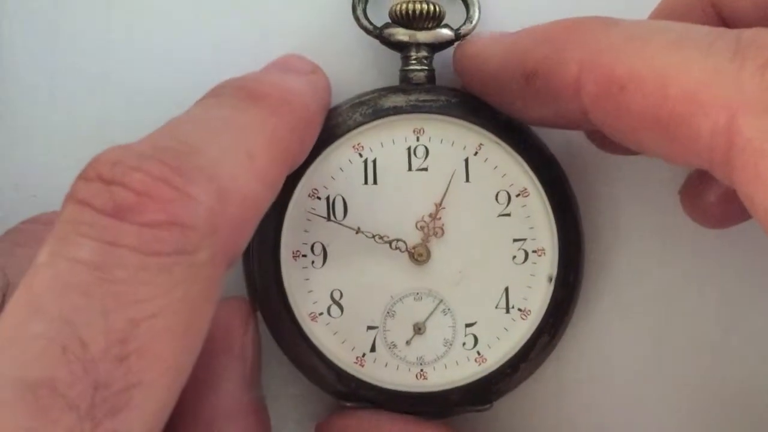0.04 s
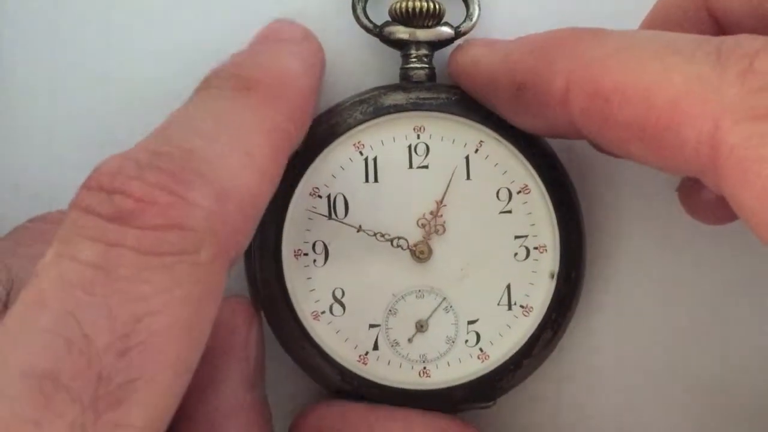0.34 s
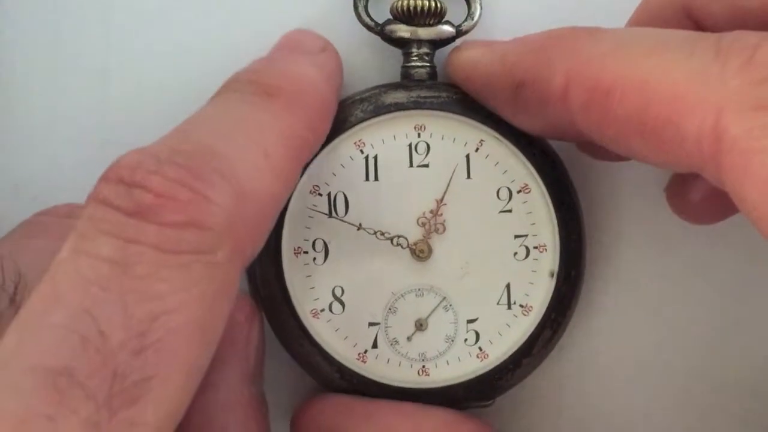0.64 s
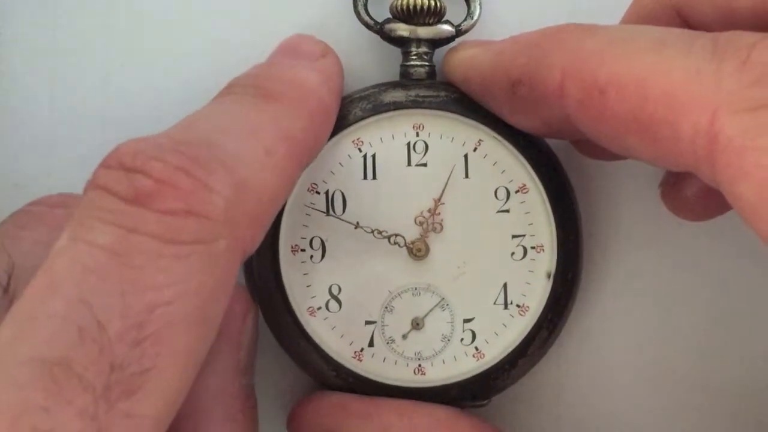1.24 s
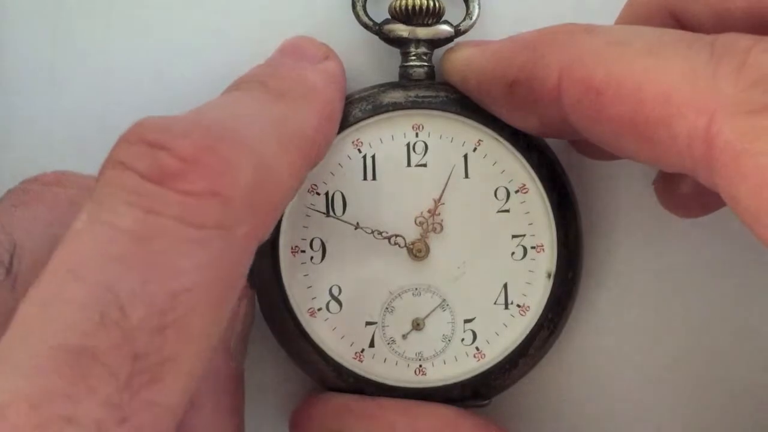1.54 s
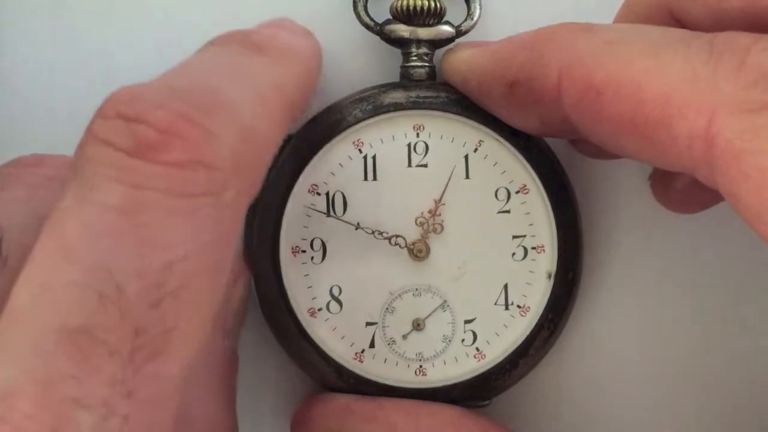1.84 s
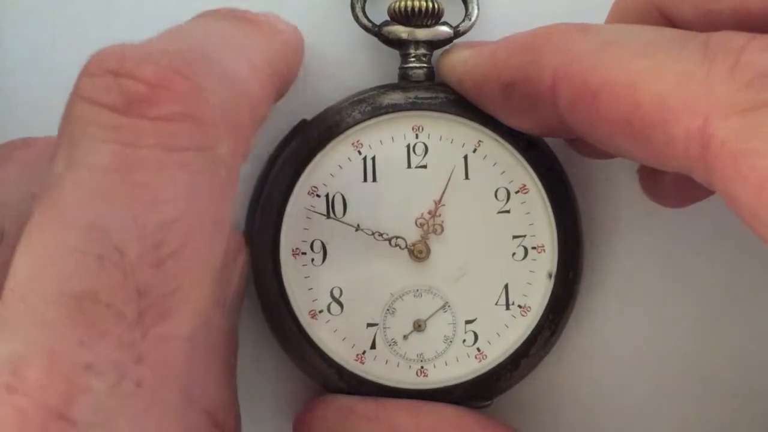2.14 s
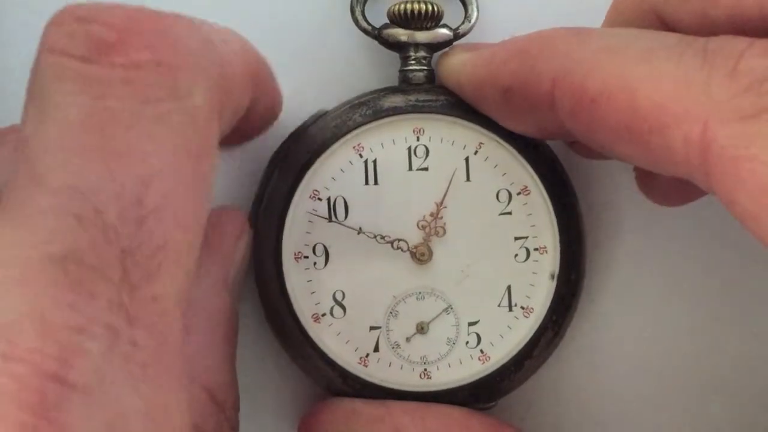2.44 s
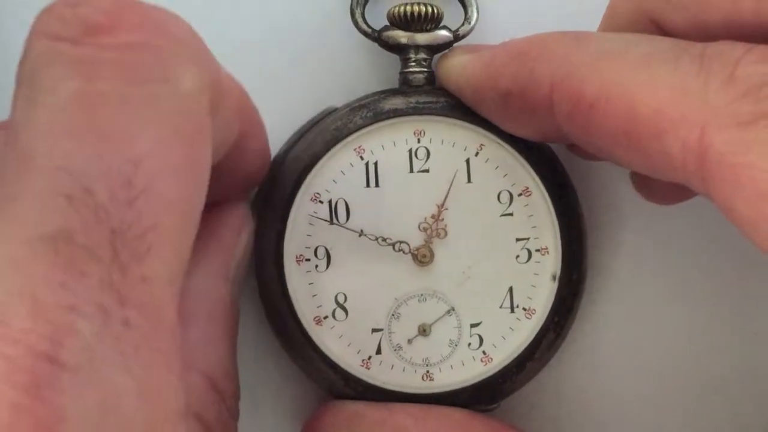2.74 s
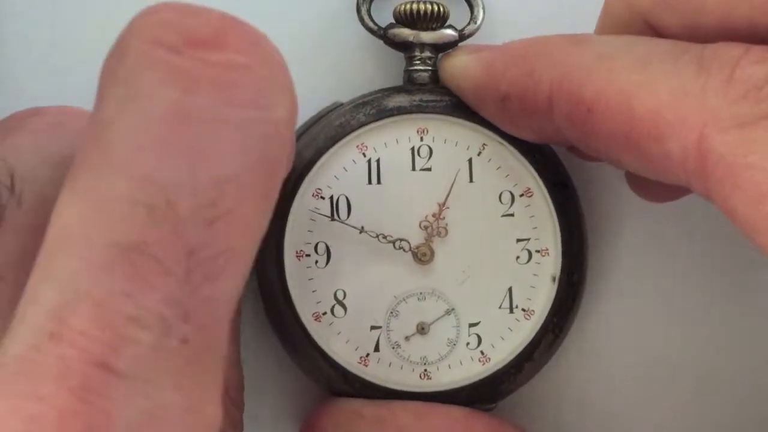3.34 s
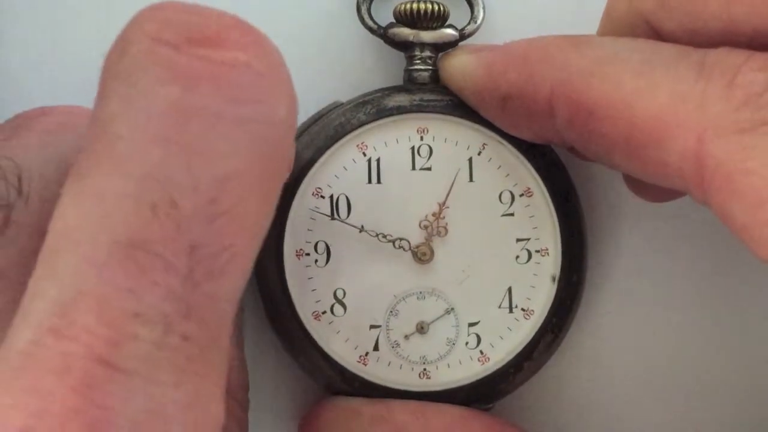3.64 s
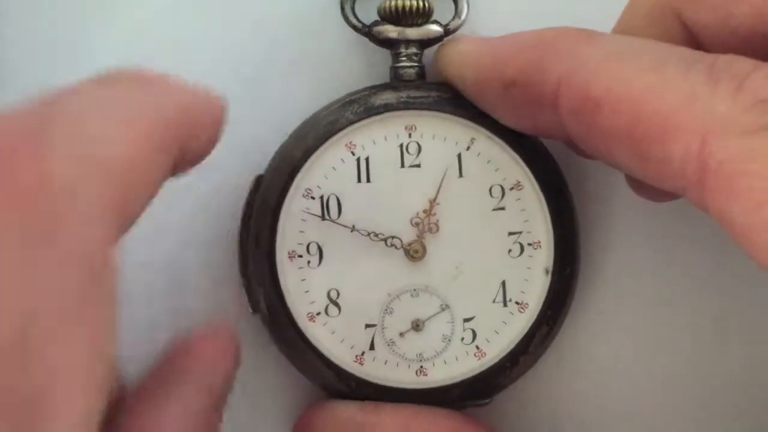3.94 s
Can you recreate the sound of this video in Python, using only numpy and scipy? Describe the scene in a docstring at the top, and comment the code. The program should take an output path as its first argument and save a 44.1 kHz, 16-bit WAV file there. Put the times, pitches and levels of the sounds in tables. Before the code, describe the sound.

A pocket watch clicks close to the microphone in a quiet room with a low hum. From about 1.6 to 2.7 seconds, its ratchet gives uneven runs of tiny metallic clicks while fingers rub and bump the case. Soft, evenly paced scuffs, perhaps slippered steps, continue behind from 1 second. Near 3.9 seconds, a brief bright hiss leads into a catch snapping shut, the loudest sound.

```python
"""A pocket watch is worked by hand close to the microphone, in a quiet room with a low hum.
After one second, soft, evenly paced scuffs begin behind it, perhaps slippered steps.
From about 1.6 to 2.7 s, fingers rub the case while the pawl (a tiny lever) clicks over the teeth
of the ratchet wheel in uneven runs, and each click makes the metal ring.
Just before the end, at about 3.9 s, a bright hiss starts and a catch snaps home."""
import sys
import numpy as np
from scipy import signal
from scipy.fft import rfft, irfft
from scipy.io import wavfile
from scipy.ndimage import uniform_filter1d

SR = 44100
rng = np.random.default_rng(int(sys.argv[2]) if len(sys.argv) > 2 else 0)


def unload_wav(signal):
    """Save mono or channel-first audio to the path in sys.argv[1] as 16-bit WAV at rate SR, clipped to [-1, 1]."""
    wavfile.write(
        sys.argv[1],
        SR,
        np.round(np.clip(np.atleast_2d(signal).T, -1, 1) * 32767).astype(np.int16),
    )


N = 176400  # 4 seconds


def amp(db):
    """Turns decibels (dB) into a number to multiply by."""
    return 10 ** (np.asarray(db) / 20)


def evened(x):
    """Scales a sound to an average level (rms) of 1."""
    return x / np.sqrt(np.mean(x ** 2) + 1e-30)


def unit(x):
    """Scales a sound to a total energy of 1."""
    return x / (np.linalg.norm(x) + 1e-20)


def sized(x, db):
    """Sets the level of a click, as if its energy were spread over 7.5 ms."""
    return unit(x) * amp(db) * np.sqrt(.0075 * SR)


def add(mix, start_s, sound):
    """Mixes a sound in at the given time."""
    part = mix[max(round(start_s * SR), 0):][:len(sound)]
    part += sound[:len(part)]


def band(hz, width_hz):
    """Noise gathered around one pitch, at an average level of 1."""
    freqs = np.fft.rfftfreq(N, 1 / SR)
    return evened(irfft(rfft(rng.standard_normal(N)) / (1 + (2 * (freqs - hz) / width_hz) ** 2), N))


def noise(colour, peaks=()):
    """Noise with a colour (its balance of low and high) and any peaks that ring in it."""
    hz, db = np.transpose(colour)
    freqs = np.fft.rfftfreq(N, 1 / SR)
    gain = amp(np.interp(np.log(freqs + 1), np.log(hz + 1), db))
    hiss = evened(irfft(rfft(rng.standard_normal(N)) * gain, N))
    return evened(hiss + sum(amp(level) * band(pitch, width) for pitch, width, level in peaks))


def grainy(x, grain_db):
    """Roughens a noise with grains about 2 ms long."""
    grains = evened(uniform_filter1d(rng.standard_normal(N), size=80))
    return evened(x * amp(grain_db * grains))


def rippled(x):
    """Reflections make random patches of pitch, about 100 Hz wide, louder or softer."""
    spectrum = rfft(x)
    patches = evened(uniform_filter1d(rng.standard_normal(len(spectrum)), size=400))
    return evened(irfft(spectrum * amp(3 * patches), N))


def swell(age, rise_s, hold_s, fall_s):
    """A loudness curve that rises, holds and dies away."""
    return np.clip(age / rise_s, 0, 1) * np.exp(-np.maximum(age - rise_s - hold_s, 0) / fall_s)


def ring(tones, t):
    """Struck metal: each tone fades by 60 dB in t60 seconds; its dB is the height of its resonance."""
    return sum((-1) ** k * amp(db - 60 * t / t60) * 2 * np.log(1000) / (t60 * SR)
               * np.cos(2 * np.pi * hz * t) for k, (hz, db, t60) in enumerate(tones))


def thud(hz, db, t60, rise_s):
    """One tone that starts softly and fades by 60 dB in t60 seconds."""
    t = np.arange(SR // 4) / SR
    return amp(db - 60 * t / t60) * (1 - np.exp(-t / rise_s)) * np.sin(2 * np.pi * hz * t)


def friction(strokes, colour, edge_s, grain_db, peaks=()):
    """Short strokes of grainy noise, each fading in and out over edge_s."""
    t = np.arange(N) / SR
    level = sum(amp(db) * np.clip(np.minimum(t - start, start + length - t) / edge_s + .5, 0, 1)
                for start, length, db in strokes)
    return level * grainy(noise(colour, peaks), grain_db)


def room(x):
    """The table and walls add a faint, short echo that begins after 3 ms."""
    t = np.arange(SR // 4) / SR
    tail = unit(rng.standard_normal(len(t)) * amp(-60 * t / .08) * (t > .003))
    return x + amp(-18) * signal.fftconvolve(x, tail)[:N]


# The colour of the room's hiss. Each row: pitch in Hz, relative level in dB.
AIR_COLOUR = [(20, -12), (30, -13), (44, -18), (64, -10.5), (95, -10), (148, -16), (219, -15.5),
              (260, -18.5), (614, -25.5), (1580, -27), (2500, -28), (4810, -32), (6200, -32), (9000, -35),
              (15000, -38)]
# The tones of the room's hum. Each row: pitch in Hz, level in dB.
HUM_TONES = [(95, -73.5), (120, -80)]
def background():
    """Even hiss and a low, steady hum that wavers a little."""
    t, hum = np.arange(N) / SR, np.zeros(N)
    for hz, db in HUM_TONES:
        tone = np.sin(2 * np.pi * (hz * t + rng.random()))
        hum += amp(db) * evened(tone + 0.49 * band(hz, width_hz=16))
    return amp(-71) * noise(AIR_COLOUR) + hum


# The colour of the brushing hiss. Each row: pitch in Hz, relative level in dB.
SCUFF_COLOUR = [(150, 6), (500, -0.5), (780, -8), (1100, -1.5), (1500, -1), (2500, -1), (2850, -4.5),
                (3250, -6), (4900, -6.5), (6000, -7.5), (9500, -11), (15000, -27)]
# Peaks in that hiss. Each row: pitch in Hz, width in Hz, level in dB against the hiss.
SCUFF_PEAKS = [(636, 140, -9), (933, 45, -16), (2080, 70, -18), (2420, 470, -12), (3150, 840, -10.5)]
# The scuffs. Each row: start in seconds, note pitch in Hz, levels of the note, thud and hiss in dB,
# hiss rise time in seconds, levels of the lower and upper hollow tones in dB against the hiss.
SCUFFS = [(1.014, 399, -67.5, -74, -60.5, 0.02, -11, -4), (1.443, 395, -64.5, -73, -62.5, 0.037, -13, -8),
          (1.921, 414, -67, -75, -68.5, 0.025, -13, -12),
          (2.356, 389, -66.5, -67, -67.5, 0.031, -19, -10.5),
          (2.783, 386, -65.5, -56, -67, 0.027, -5, -8.5), (3.196, 403, -64, -59.5, -69, 0.032, -16, -5.5),
          (3.624, 397, -61.5, -58, -65.5, 0.062, -17, -3.5)]
def scuffs():
    """Each scuff is a low note, a swell of hollow brushing hiss and the dull thud of weight under it."""
    t, out = np.arange(N) / SR, np.zeros(N)
    brush = grainy(noise(SCUFF_COLOUR, SCUFF_PEAKS), grain_db=1.8)
    lower, upper = band(1357, width_hz=86), band(1690, width_hz=150)
    for start, hz, note_db, thud_db, hiss_db, rise_s, lower_db, upper_db in SCUFFS:
        shape = swell(t - start, rise_s=0.0044, hold_s=0.038, fall_s=0.052)
        out += amp(note_db) * unit(shape * band(hz, width_hz=64)) * np.linalg.norm(shape)
        hiss = evened(rippled(brush) + amp(lower_db) * lower + amp(upper_db) * upper)
        out += amp(hiss_db) * hiss * swell(t - start, rise_s, hold_s=0.039, fall_s=0.042)
        add(out, start, thud(hz=169, db=thud_db, t60=0.22, rise_s=0.028))
    return out


# Dull finger bumps. Each row: start in seconds, pitch in Hz, level in dB.
BUMPS = [(1.122, 92, -56), (1.556, 97, -52), (1.975, 91.5, -54), (2.166, 343, -62), (2.491, 398, -62),
         (2.532, 225, -55), (2.56, 64, -57)]
def finger_bumps():
    """Fingers bump the watch as they shift their grip."""
    out = np.zeros(N)
    for start, hz, db in BUMPS:
        add(out, start, thud(hz, db, t60=0.11, rise_s=0.0029))
    return out


# Finger strokes. Each row: start in seconds, length in seconds, level in dB.
RUBS = [(1.55, 0.15, -76), (1.74, 0.075, -71), (1.98, 0.15, -73.5), (2.165, 0.13, -71.5),
        (2.46, 0.144, -74.5), (2.626, 0.035, -65), (2.66, 0.042, -70.5), (3.964, 0.0094, -47)]
# The colour of the rubbing. Each row: pitch in Hz, relative level in dB.
RUB_COLOUR = [(200, 5), (700, -9), (1100, -4), (1500, -7), (1900, -3), (2300, -2), (3000, -11), (6000, -12),
              (9000, -19), (15000, -34)]
# Where the rubbed case rings. Each row: pitch in Hz, width in Hz, level in dB against the rubbing.
RUB_PEAKS = [(1430, 60, -8), (2024, 76, -8.5), (2330, 160, -9.5)]
def finger_rubs():
    """Fingers rub the case, which rings faintly under them."""
    return friction(RUBS, RUB_COLOUR, edge_s=0.032, grain_db=4.0, peaks=RUB_PEAKS)


# Drags inside the watch. Each row: start in seconds, length in seconds, level in dB.
DRAGS = [(.2, 0.024, -79), (.395, 0.039, -74), (1.57, 0.68, -80.5), (1.98, 0.14, -98), (2.458, 0.057, -67),
         (2.515, 0.09, -70)]
# The colour of the dragging. Each row: pitch in Hz, relative level in dB.
DRAG_COLOUR = [(1000, -18), (2400, -8), (3000, -11), (4200, -0.5), (5600, -4.5), (7800, -6), (9700, -4),
               (14500, -13)]
def mechanism_drag():
    """Parts of the mechanism drag with a faint, dry scrape."""
    return friction(DRAGS, DRAG_COLOUR, edge_s=0.013, grain_db=3.0)


# The bright hiss around the snap. Its one row: start in seconds, length in seconds, level in dB.
HISSES = [(3.878, 0.14, -58.5)]
# The colour of that hiss. Each row: pitch in Hz, relative level in dB.
HISS_COLOUR = [(300, -18), (1500, -24), (2300, -15), (3000, -19), (4800, -19), (5900, -10.5), (6400, -7),
               (7000, -4.5), (7800, -19), (10300, -17), (11800, -9.5), (15000, -14)]
def bright_hiss():
    """A smooth, bright hiss starts just before the snap and runs through it."""
    return friction(HISSES, HISS_COLOUR, edge_s=.009, grain_db=0.5)


# The tones of the case. Each row: pitch in Hz, relative level in dB, seconds to fade by 60 dB.
CASE_TONES = [(640, -6.5, 0.017), (940, -15.5, 0.0037), (1283, -6, 0.011), (2300, -2.5, 0.011),
              (3220, -1, 0.015), (4100, -3, 0.007), (4860, -3, 0.011), (5150, 2.5, 0.0052),
              (5670, 4, 0.0045), (7100, 2, 0.0023), (7490, 2, 0.0049), (8100, -9, 0.0056),
              (9700, -6, 0.0038), (10560, -7.5, 0.0043), (12200, -3, 0.0094), (14200, -15, 0.0039)]
# Hits of the catch. Each row: start in seconds, level of the bright tones in dB, bounce delay in
# seconds, bounce as a share of the hit, rattle in dB against the hit, level of the low tones in dB.
SNAPS = [(3.954, -54, .0005, 0.25, -26, -60), (3.9565, -35.5, 0.00076, 0.19, -29, -49),
         (3.9886, -47, .0005, .3, -25, -60), (3.9915, -19, .00087, 0.5, -6, -25.5)]
def catch_snap():
    """At each hit the catch bounces once and rattles, ringing the case; letting go jolts the watch."""
    out, t = np.zeros(N), np.arange(1024) / SR
    split_hz, rattle_s = 4300, 0.006
    bright = [tone for tone in CASE_TONES if tone[0] > split_hz]
    low = [tone for tone in CASE_TONES if tone[0] <= split_hz]
    for start, bright_db, bounce_s, bounce, rattle_db, low_db in SNAPS:
        force = amp(rattle_db) * unit(rng.standard_normal(len(t)) * np.exp(-(t / rattle_s) ** 4))
        force[0] += 1  # the hit itself
        add(force, bounce_s, np.array([bounce]))
        for tones, db in ((bright, bright_db), (low, low_db)):
            add(out, start, sized(signal.fftconvolve(force, ring(tones, t)), db))
    jolt = thud(hz=243, db=-40.5, t60=0.09, rise_s=0.0037)
    add(out, start_s=3.9565, sound=jolt)
    return out


# The tones of the mechanism. Each row: pitch in Hz, relative level in dB, seconds to fade by 60 dB.
MECHANISM_TONES = [(3290, -8, 0.015), (4130, 1.5, 0.012), (5200, -6, 0.006), (5860, 0, 0.004),
                   (6270, 2, 0.008), (7400, 7, 0.0084), (8440, -1.5, 0.0027), (9760, 2, 0.011),
                   (11850, -9, 0.0028), (14000, -2, 0.0044)]
# The three pitch ranges of a click: body, ping and bright tick. Each row: bottom in Hz, top in Hz.
CLICK_RANGES = [(2900, 4500), (4700, 6700), (6800, 15500)]
# The pawl dropping off each tooth. Each row: start in seconds, chatter time in seconds,
# pitch of the case in Hz, then levels of the case, body, ping and bright tick in dB.
TEETH = [(1.5818, 0.0017, 2200, -84, -67.5, -67, -67.5), (1.62, 0.0016, 2510, -77, -67, -65, -68),
         (1.65, 0.0021, 2480, -76, -68.5, -65, -70), (1.6973, 0.0028, 2590, -75, -67.5, -64, -68),
         (1.7296, 0.0033, 2380, -73, -70, -66.5, -70), (1.76, 0.0031, 2350, -76, -68, -66, -69),
         (1.811, 0.0034, 2540, -71, -70, -67.5, -70.5), (1.864, 0.0045, 2440, -68, -68, -60, -65),
         (1.9912, 0.0031, 2440, -60.5, -66, -57.5, -64.5), (2.0927, 0.0018, 2400, -80, -82, -73, -83),
         (2.12, 0.0022, 2510, -65.5, -69, -50, -55.5), (2.179, 0.0028, 2400, -79, -81, -65.5, -68),
         (2.1849, 0.00065, 2330, -61.5, -77, -50, -57.5), (2.204, 0.0093, 2350, -70, -70, -65, -63),
         (2.2211, 0.0016, 2300, -60, -58, -48.5, -52.5), (2.2644, 0.0022, 2330, -63, -74, -51.5, -57.5),
         (2.4222, 0.0008, 2440, -67, -77, -50.5, -53.5), (2.467, 0.00063, 2370, -67, -77, -53.5, -55),
         (2.4967, 0.00062, 2500, -65, -68, -52.5, -53.5), (2.519, 0.0014, 2420, -71, -70, -53, -54),
         (2.538, 0.0037, 2510, -68, -60, -56, -57), (2.5594, 0.0028, 2380, -62, -67, -76, -60),
         (2.569, .003, 2360, -68, -78, -78, -78), (2.5907, 0.0031, 2280, -67.5, -79, -61, -61),
         (2.648, .002, 2010, -78, -84, -69, -74)]
def ratchet():
    """The pawl hits each tooth and chatters for a moment, ringing the mechanism and the case."""
    out, t = np.zeros(N), np.arange(2048) / SR
    for start, chatter_s, case_hz, case_db, *range_dbs in TEETH:
        force = rng.standard_normal(len(t)) * np.exp(-(t / chatter_s) ** 2)
        force[0] = 4.9  # the first contact is stronger than the chatter
        detuned = [(hz * (1 + .01 * rng.standard_normal()), db, t60) for hz, db, t60 in MECHANISM_TONES]
        metal = unit(ring(detuned, t))
        metal[0] += 0.46  # the dry part of the click, with no pitch
        click = signal.fftconvolve(force, metal)
        for edges_hz, db in zip(CLICK_RANGES, range_dbs):
            band_pass = signal.butter(2, edges_hz, "band", fs=SR, output="sos")
            add(out, start, sized(signal.sosfilt(band_pass, click), db))
        add(out, start, sized(thud(case_hz, db=0, t60=0.014, rise_s=chatter_s), case_db))
    return out


def scene():
    """The watch in front, the scuffs and the room behind, in one channel."""
    fingers = finger_rubs() + finger_bumps()
    hisses = mechanism_drag() + bright_hiss()
    clicks = room(ratchet()) + room(catch_snap())
    return (clicks + hisses + fingers + scuffs() + background())[None]


def record(dry):
    """The microphone cuts deep rumble, softens one narrow high band and drops the highest treble."""
    rumble_hz, dip_hz, dip_share, top_hz = 38.7, 10360, 0.62, 15400
    x = signal.sosfilt(signal.butter(2, rumble_hz, "high", fs=SR, output="sos"), dry)
    notched = signal.lfilter(*signal.iirnotch(dip_hz, Q=47, fs=SR), x)
    dipped = x + dip_share * (notched - x)
    low_pass = signal.firwin(301, top_hz, window=("kaiser", 8), fs=SR)
    return signal.oaconvolve(dipped, low_pass[None], "same")


dry = scene()
out = record(dry)
unload_wav(out)
```